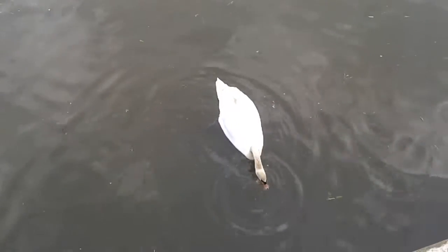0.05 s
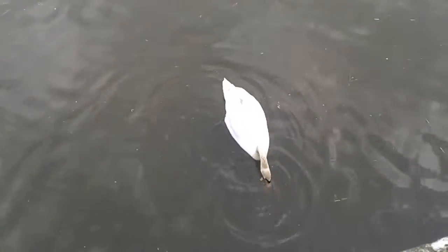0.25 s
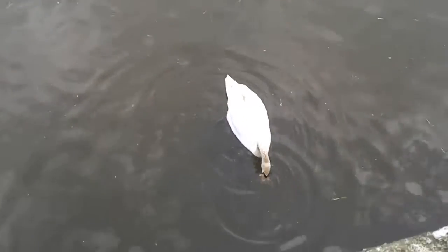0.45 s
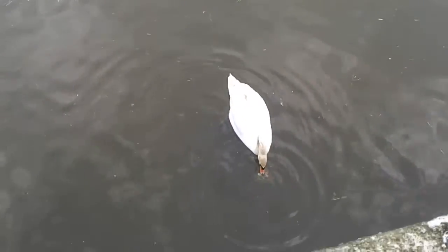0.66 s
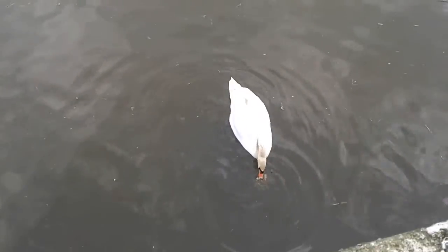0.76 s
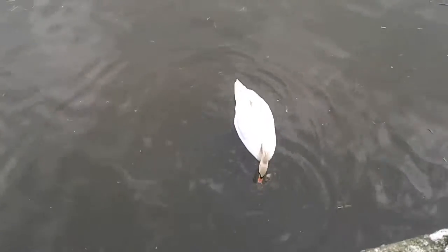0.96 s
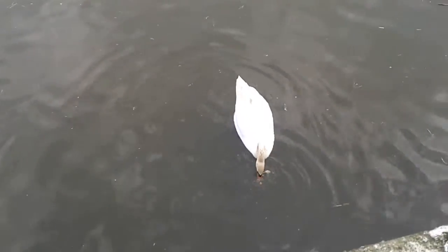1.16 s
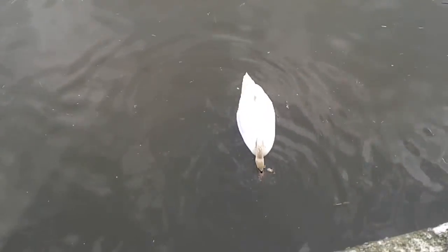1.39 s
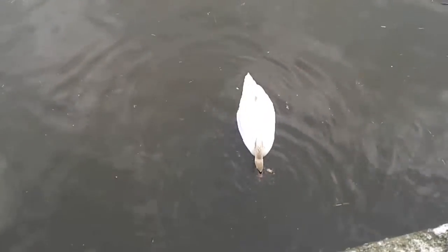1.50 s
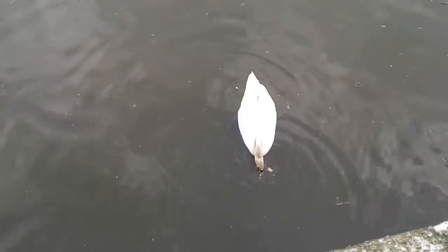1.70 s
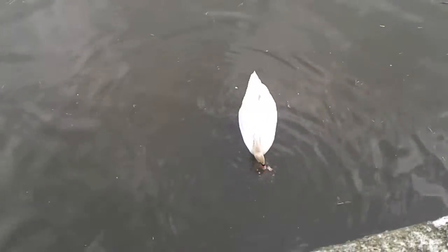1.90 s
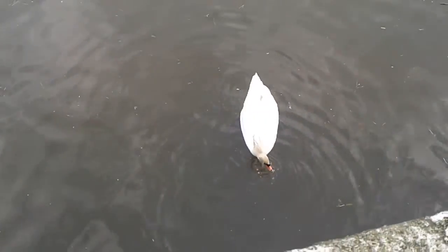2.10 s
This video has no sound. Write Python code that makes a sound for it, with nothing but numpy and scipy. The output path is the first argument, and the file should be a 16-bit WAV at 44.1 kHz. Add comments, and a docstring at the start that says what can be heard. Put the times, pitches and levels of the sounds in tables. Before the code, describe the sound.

Short, hollow swishes of a swan feeding on a calm river, with low wind puffs.

```python
"""A short, hollow swish over the quiet hush of a calm river, where a swan feeds below an embankment.
A few more swishes follow, perhaps from its bill: noise swelling through resonances and stopping short.
Puffs of wind bump the microphone with low flutters and pops. A small songbird whistles far off,
echoed by the banks, while drops and bill snaps make small wet ticks, each a ring with a crack.
Near the end come faint calls, so distant that they are only a blur."""
import sys
import numpy as np
from scipy import signal
from scipy.fft import rfft, irfft, next_fast_len
from scipy.io import wavfile
from scipy.ndimage import map_coordinates

SR = 44100
rng = np.random.default_rng(int(sys.argv[2]) if len(sys.argv) > 2 else 0)


def unload_wav(signal):
    """Save mono or channel-first audio to the path in sys.argv[1] as 16-bit WAV at rate SR, clipped to [-1, 1]."""
    wavfile.write(
        sys.argv[1],
        SR,
        np.round(np.clip(np.atleast_2d(signal).T, -1, 1) * 32767).astype(np.int16),
    )


N = 94682


def amp(db):
    """Decibels to gain."""
    return 10 ** (np.asarray(db) / 20)


def clock():
    """Time of every sample in seconds."""
    return np.arange(N) / SR


def wobble(rate):
    """A smooth random curve with rate knots a second."""
    knots = rng.standard_normal(int(N * rate / SR) + 4)
    return map_coordinates(knots, [clock() * rate])


def filtered(x, response):
    """x shaped by a response, a gain for each frequency."""
    size = next_fast_len(N + SR // 4)
    hz = np.fft.rfftfreq(size, 1 / SR)
    return irfft(rfft(x, size) * response(hz), size)[:N]


def noise(response):
    """Noise coloured by a response and scaled to rms 1."""
    x = filtered(rng.standard_normal(N), response)
    return x / np.sqrt(np.mean(x ** 2) + 1e-20)


def colour(points):
    """An EQ curve through (Hz, dB) points on a log frequency axis."""
    hz, db = np.transpose(points)
    return lambda f: amp(np.interp(np.log(f + 1), np.log(hz), db))


def resonant(rows):
    """The response of steep resonances, each given as (Hz, width in Hz, dB)."""
    return lambda f: sum(amp(db) * (f * width) ** 2 / ((hz * hz - f * f) ** 2 + (f * width) ** 2)
                         for hz, width, db in rows)


def river():
    """A steady outdoor hush whose rumble sways, and a faint wash of ripples."""
    # Tone of the hush and of the ripples. Each row: frequency in Hz, relative level in dB.
    hush_eq = [(15, -47), (28, -32), (55, 3), (95, 4.5), (165, -3), (300, -14.5), (550, -12), (950, -18.5),
               (1500, -20.5), (2600, -25.5), (4400, -27), (6000, -28.5), (8600, -33), (15500, -33)]
    wash_eq = [(300, 18), (700, 7.5), (1500, 2.5), (2400, -1.5), (3500, -10), (6000, -7), (8500, -18)]
    # The ripples rise and fall. Each row: time in seconds, level in dB.
    wash_fader = [(0, -64), (.7, -63.5), (1.05, -56), (1.3, -55), (1.47, -53.5), (1.58, -61.5), (1.85, -59),
                  (2.14, -54.5)]
    t, hush_db, sway_db = clock(), -56, 4
    hush = amp(hush_db) * noise(colour(hush_eq))
    rumble = filtered(hush, lambda f: 1 / (1 + (f / 300) ** 2))
    wash_db = np.interp(t, *np.transpose(wash_fader)) + 0.5 * wobble(rate=38.92)
    wash = amp(wash_db) * noise(colour(wash_eq))
    sway = amp(sway_db * wobble(rate=9.74))
    return hush + rumble * (sway - 1) + wash


def swishes():
    """Each swish swells and stops short: narrow rings come first, then the hollow body, then hiss."""
    # Each row: peak time, the body's swell time and hold time in seconds,
    # then the levels in dB of body, nasal ring, reedy ring, hiss and sizzle.
    strokes = [(0.009, 0.046, 0.03, -52, -53, -58, -54, -61.5),
               (0.889, 0.099, 0.06, -55.5, -62, -56.5, -60.5, -62.5),
               (1.115, 0.1, 0.065, -52.5, -71, -61.5, -58, -69.5),
               (1.42, 0.075, 0.012, -43.5, -45, -55.5, -52, -51),
               (1.731, 0.082, 0.035, -45.5, -47.5, -55.5, -58.5, -65)]
    # Resonances of a swish. Each row: centre in Hz, width in Hz, relative level in dB.
    body = [(739, 137, 12), (1078, 53, 12.5), (1208, 86, 9), (1445, 165, 9), (1693, 40, 1.5)]
    nasal = [(1908, 240, 0.5), (2010, 195, -14.5)]
    reedy = [(2344, 510, 2), (2580, 51, -21)]
    sizzle = [(5240, 1140, -3.5), (5810, 450, 4.5), (6530, 170, 6.5), (7240, 600, -4), (7940, 750, -11.5)]
    # Tone of the hiss. Each row: frequency in Hz, relative level in dB.
    hiss = [(500, -4), (1500, -10), (2400, 5), (3000, 2), (3270, 6.5), (3520, 4), (3750, 4.5), (4200, -2.5),
            (4750, 5), (5300, 5), (6200, -36), (9000, -28)]
    swell_db, fall_20db_s, rasp_db = 17, 0.027, 1
    ring_lead, hiss_lead = 1.09, 0.62  # swell times as multiples of the body's
    layers = [(resonant(body), 1), (resonant(nasal), ring_lead), (resonant(reedy), ring_lead),
              (colour(hiss), hiss_lead), (resonant(sizzle), hiss_lead)]
    t, out = clock(), np.zeros(N)
    for k, (response, lead) in enumerate(layers):
        envelope = np.zeros(N)
        for peak, swell, hold, *layer_db in strokes:
            rise_db = swell_db * np.minimum(t - peak, 0) / (swell * lead)
            fall_db = 20 * np.maximum(t - peak - hold, 0) / fall_20db_s
            envelope += amp(layer_db[k] + rise_db - fall_db)
        out += envelope * noise(response)
    return out * amp(rasp_db * wobble(rate=260))


def wind():
    """Puffs flutter on the microphone port; each passing eddy is a brief pressure drop, heard as a pop."""
    # Soft puffs. Each row: centre and half length in seconds, level in dB, upper edge in Hz.
    puffs = [(.072, 0.017, -34.5, 330), (0.42, 0.0069, -33.5, 238), (0.517, 0.013, -42, 222),
             (0.609, .016, -36, 255), (0.668, 0.01, -48.5, 200), (0.767, 0.012, -47.5, 200),
             (0.891, .01, -37, 377), (1.048, 0.019, -46, 170), (1.101, 0.011, -32.5, 308),
             (1.136, 0.038, -44.5, 175), (1.247, 0.039, -37, 250), (1.318, 0.008, -30, 390),
             (1.361, 0.0072, -38, 460), (1.402, .007, -33.5, 384), (1.461, 0.044, -51.5, 253),
             (1.632, 0.015, -40, 186), (1.778, 0.01, -44.5, 289), (1.838, 0.0095, -35.5, 312),
             (1.87, 0.023, -28, 244), (2.023, 0.036, -44.5, 234), (2.058, 0.021, -27, 294),
             (2.13, 0.11, -43, 250)]
    # Sharp pops. Each row: time in seconds, peak in dB before the final filter, width in milliseconds.
    pops = [(0.058, -26, 1.07), (.068, -24, 1.12), (.421, -31, 1.46), (.4275, -34.5, 0.58),
            (.599, -30, 1.02), (0.6102, -21, 2.24), (.624, -26, 1.46), (.786, -23.5, 1.12),
            (0.8852, -29.5, 1.36), (0.892, -27.5, 0.58), (1.103, -28.5, 0.92), (1.3145, -19.5, 0.39),
            (1.318, -30.5, 0.41), (1.402, -28.5, 0.86), (1.639, -32.5, 2.4), (1.837, -24.5, 2.3),
            (1.868, -20.5, 1.65), (1.877, -19.5, 0.93), (2.007, -24, 1.6), (2.03, -21.5, 0.91),
            (2.04, -19, 2.7), (2.0565, -18.5, 0.48), (2.0712, -16.5, 0.71), (2.122, -21.5, 0.8)]
    puff_low_hz, puff_slope = 88, 4.18
    port_hz, port_q = 135.5, 0.71  # the port rings a little at its bass roll-off
    sub_hz, top_hz = 43.3, 1160  # the final filter passes little outside this band
    t, out = clock(), np.zeros(N)
    for centre, half, db, edge_hz in puffs:
        flutter = noise(lambda f: f * f / (f * f + puff_low_hz ** 2) / (1 + (f / edge_hz) ** puff_slope))
        envelope = amp(db) / (1 + ((t - centre) / half) ** 2 / 4) ** 4
        out += envelope * flutter
    omega = 2 * np.pi * port_hz
    port_highpass = signal.bilinear([1, 0, 0], [1, omega / port_q, omega ** 2], SR)
    for centre, db, width_ms in pops:
        offset = (t - centre) * 1000 / width_ms
        pressure_drop = -(1 + offset ** 2) ** -1.5
        pop = signal.lfilter(*port_highpass, pressure_drop)
        out += amp(db) * pop / np.abs(pop).max()
    return filtered(out, lambda f: f * f / (f * f + sub_hz ** 2) / np.sqrt(1 + (f / top_hz) ** 8))


def songbird():
    """Thin gliding whistles, some crisp and some smeared by the echo of the banks."""
    # Each row: start and length in seconds, first and last pitch in Hz, level in dB, echo send in dB.
    notes = [(0.075, 0.083, 4000, 3850, -67.5, 0), (0.141, 0.053, 3730, 3125, -58.5, -0.5),
             (0.203, 0.04, 3430, 3206, -61, -9), (0.252, 0.051, 2990, 2740, -70, -11),
             (0.21, 0.1, 3740, 3660, -66, 0), (0.301, 0.05, 3480, 2750, -72, 1),
             (0.353, 0.086, 3695, 3650, -66.5, -3), (0.355, .21, 4315, 4240, -65.5, -1.5),
             (0.423, 0.029, 3600, 3450, -59.5, -3.5), (.43, 0.055, 2530, 2564, -64.5, -5),
             (0.566, 0.088, 7000, 5580, -61.5, 0), (0.639, .08, 7020, 5650, -65.5, -7),
             (0.751, .085, 6810, 5400, -57.5, -1), (.82, .04, 5570, 4850, -61.5, -9),
             (1.194, 0.067, 4250, 3900, -69, 4.5), (1.31, 0.054, 6020, 6550, -61.5, -16),
             (1.608, 0.091, 5080, 5100, -63, -2.5), (1.783, 0.14, 6880, 6510, -66, -5),
             (1.964, 0.063, 5190, 4650, -70.5, 2)]
    glide_bend, warble_depth, flutter_db, echo_t60_s = 1.6, 0.01067, 2.5, 0.93
    t, direct, send = clock(), np.zeros(N), np.zeros(N)
    for start, length, from_hz, to_hz, db, send_db in notes:
        progress = np.clip((t - start) / length, 0, 1)
        glide_hz = to_hz + (from_hz - to_hz) * (1 - progress) ** glide_bend  # flattens as it lands
        hz = glide_hz * (1 + warble_depth * wobble(rate=300))
        arch = np.sqrt(np.abs(np.sin(np.pi * progress)))
        envelope = arch * amp(db + flutter_db * wobble(rate=90.6))
        whistle = envelope * np.sin(2 * np.pi * np.cumsum(hz) / SR)
        direct += whistle
        send += amp(send_db) * whistle
    tail = rng.standard_normal(SR // 2) * amp(-60 * t[:SR // 2] / echo_t60_s)
    echo = signal.fftconvolve(send, tail / np.linalg.norm(tail))[:N]
    return direct + echo


def wet_ticks():
    """Drops and bill snaps: a short ring with a broad crack."""
    # Each row: start in seconds, relative level in dB, pitch in Hz, seconds to fall 60 dB,
    # level of the crack against the ring in dB.
    ticks = [(0.129, -58.5, 6200, .02, -18), (.312, -54.5, 1444, .05, -24), (.643, -56, 1500, .04, -28),
             (0.811, -54, 1810, 0.05, -27), (1.066, -50, 5400, 0.014, -24), (1.34, -40, 5400, 0.017, -6.5),
             (1.927, -53, 6400, 0.011, -11)]
    width_ratio, crack_top_hz, trim_db = 0.15, 12000, -1
    t, out = clock(), np.zeros(N)
    for start, db, hz, t60, crack_db in ticks:
        ring = noise(resonant([(hz, hz * width_ratio, 0)]))
        crack = amp(crack_db) * noise(lambda f: 1 / (1 + (f / crack_top_hz) ** 4))
        envelope = amp(db + trim_db - 60 * np.maximum(t - start, 0) / t60) * (t >= start)
        out += envelope * (ring + crack)
    return out


def far_birds():
    """Calls so distant that only a narrow blur of echo is left."""
    # Each row: centre and half length in seconds, pitch and bandwidth in Hz, level in dB.
    calls = [(1.84, 0.1, 3160, 597, -67), (1.97, 0.15, 1970, 400, -64.5), (2.084, 0.1, 2520, 400, -65)]
    t, out = clock(), np.zeros(N)
    for centre, half, hz, width, db in calls:
        envelope = amp(db) * np.exp(-((t - centre) / half) ** 2 / 2)
        out += envelope * noise(resonant([(hz, width, 0)]))
    return out


def scene():
    """River, swan, wind and birds mixed in mono."""
    return (river() + swishes() + wind() + songbird() + wet_ticks() + far_birds())[None]


def record(dry):
    """A brick-wall low-pass takes off the highest treble."""
    top_hz = 15720
    return np.array([filtered(channel, lambda f: f < top_hz) for channel in dry])


dry = scene()
out = record(dry)
unload_wav(out)
```